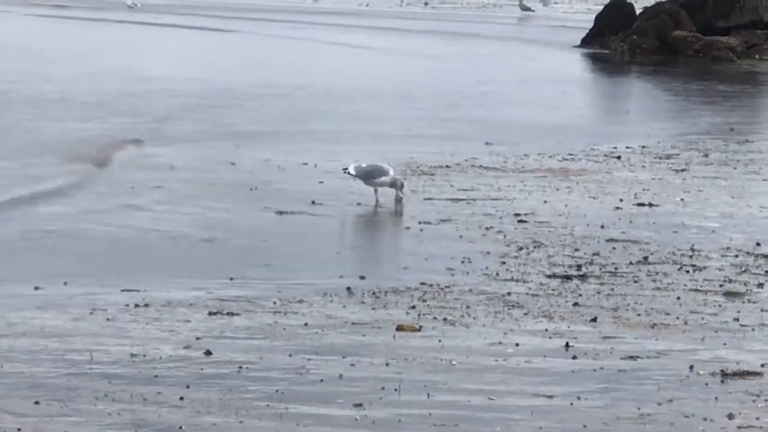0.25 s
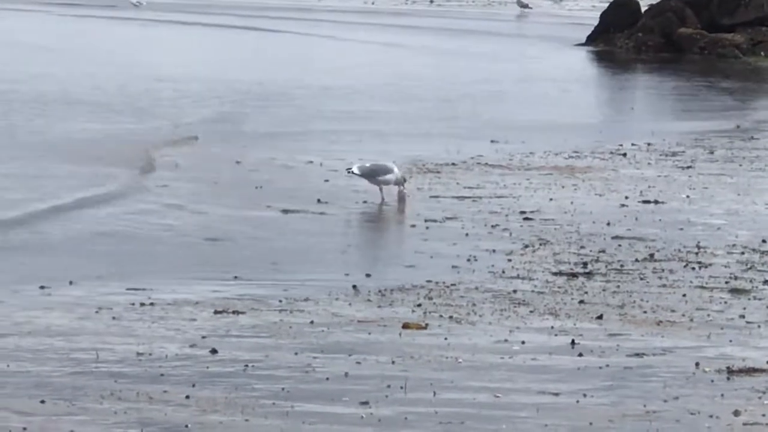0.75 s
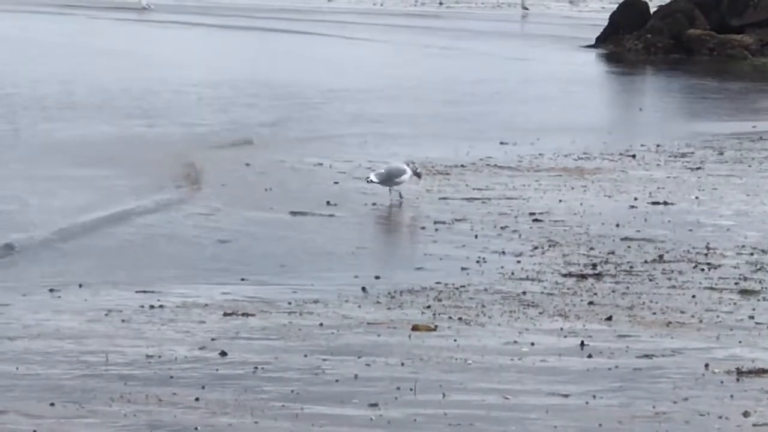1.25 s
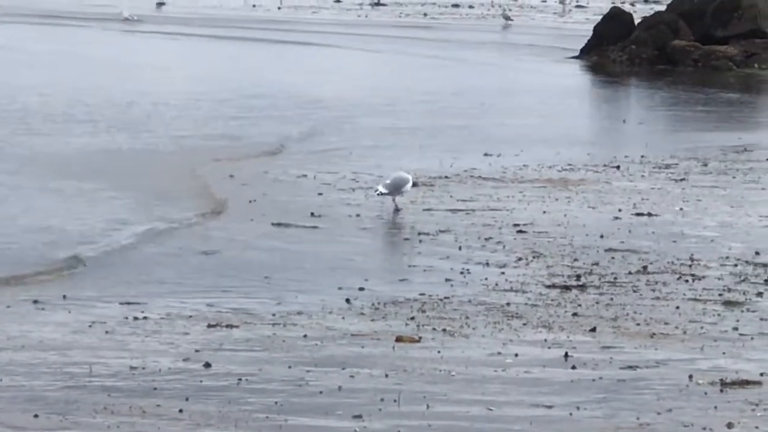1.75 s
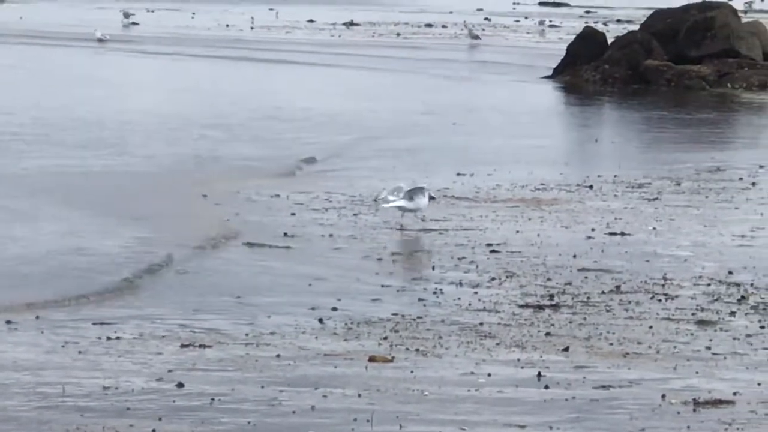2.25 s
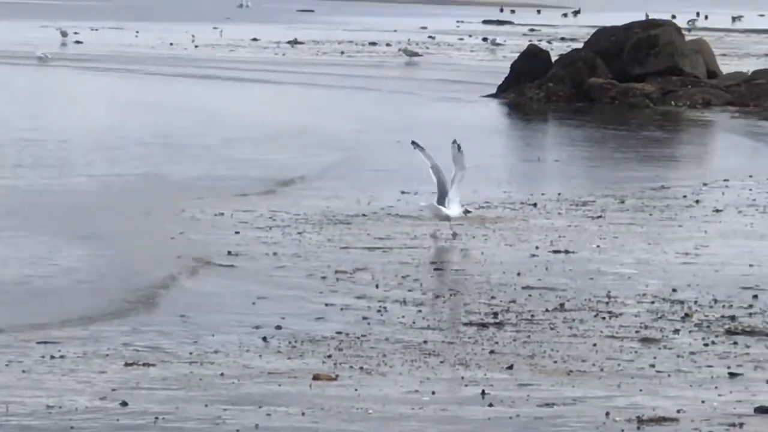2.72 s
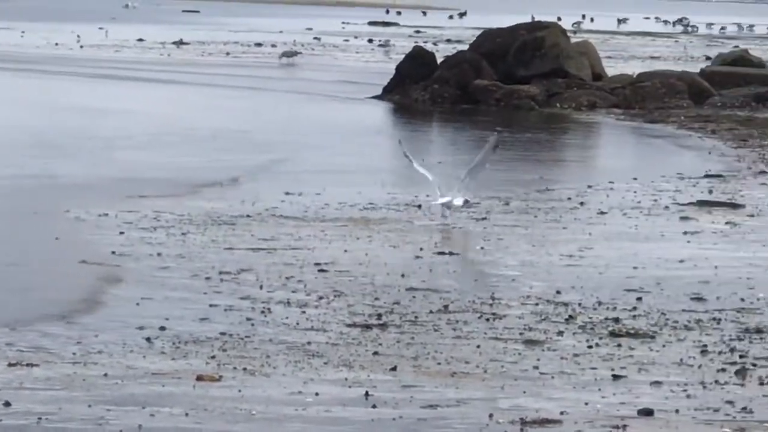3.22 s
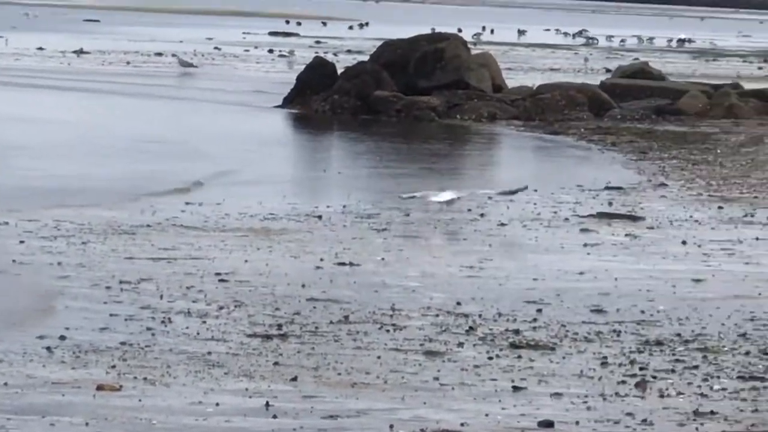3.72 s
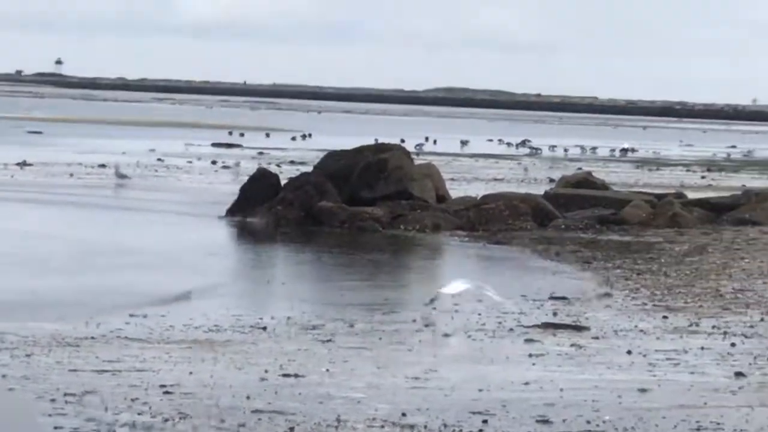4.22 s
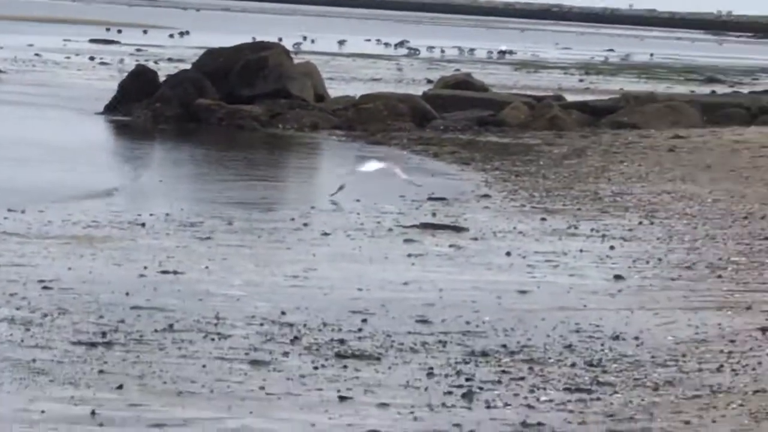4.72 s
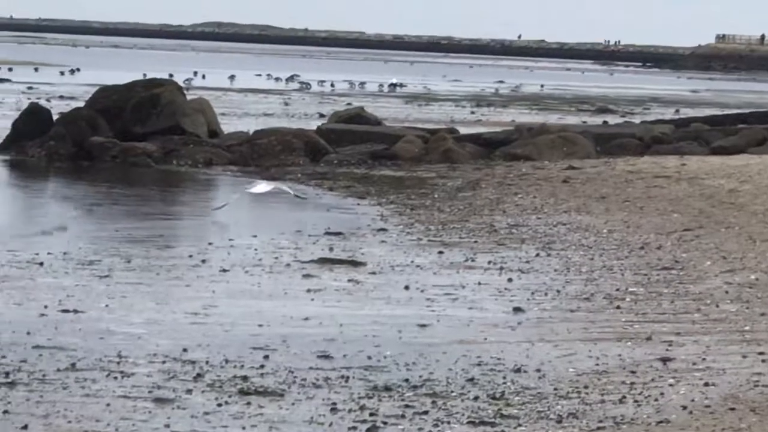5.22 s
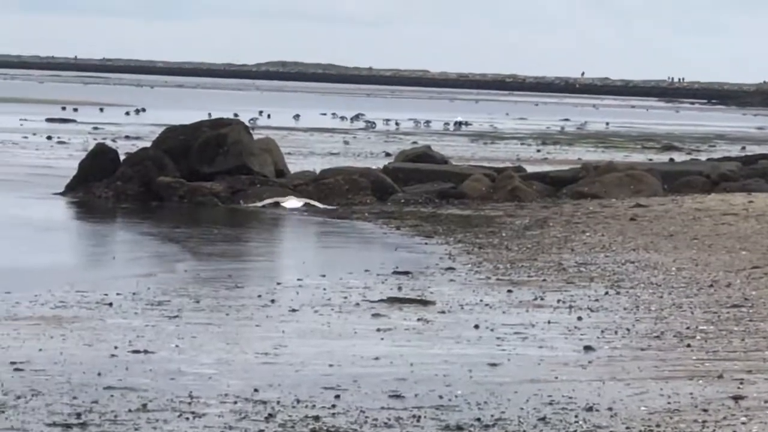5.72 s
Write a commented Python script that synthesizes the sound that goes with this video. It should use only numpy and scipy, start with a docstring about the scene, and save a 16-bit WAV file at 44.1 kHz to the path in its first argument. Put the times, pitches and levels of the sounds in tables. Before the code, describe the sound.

A gull gives two breaking squeals that end in squawks, then ten sharp yelps echoing off water and rocks, over a faint shore wash and low hum.

```python
"""A gull gives a long call on a tidal flat: two breaking squeals, each ending in a squawk, then ten yelps.
Most notes open with a slow pulsed creak; whistled tones with weak harmonics then crack between registers.
Delayed copies from water and rocks throw the call back. A far motor hums as a stack of sine orders,
a distant bird pipes gliding sines, and rustles and ticks of shaped noise stand over the noise wash of the shore."""
import sys
import numpy as np
from scipy import signal
from scipy.fft import rfft, irfft, next_fast_len
from scipy.io import wavfile
from scipy.ndimage import uniform_filter1d, map_coordinates

SR = 44100
rng = np.random.default_rng(int(sys.argv[2]) if len(sys.argv) > 2 else 0)


def file_out(sig):
    """Save sig as 16-bit WAV at sys.argv[1]."""
    # one column per channel
    cols = np.atleast_2d(sig).T
    # limit, then scale
    lim = np.clip(cols, -1, 1)
    pcm = np.round(lim * 32767).astype(np.int16)
    wavfile.write(sys.argv[1], SR, pcm)


N = 262836  # length in samples


def amp(db):
    """Decibels to gain."""
    return 10 ** (np.asarray(db) / 20)


def evened(x):
    """Scales to rms 1."""
    return x / np.sqrt(np.mean(x ** 2) + 1e-20)


def read(points, hz):
    """Reads a spectrum on a log-frequency axis."""
    f, value = np.transpose(points)
    return np.interp(np.log(hz + 1), np.log(f + 1), value)


def add(mix, s, sound):
    """Adds a sound at time s."""
    part = mix[max(round(s * SR), 0):][:len(sound)]
    part += sound[:len(part)]


def noise(colour):
    """Noise of rms 1 with the given spectrum."""
    spectrum = rfft(rng.standard_normal(N))
    return evened(irfft(spectrum * amp(read(colour, np.fft.rfftfreq(N, 1 / SR))), N))


def wander(size, hz):
    """Random drift, scaled to rms 1 over at least a second, that rolls off steeply above hz."""
    span = next_fast_len(max(size, SR))
    f = np.fft.rfftfreq(span, 1 / SR)
    return evened(irfft(rfft(rng.standard_normal(span)) / (1 + (f / hz) ** 4), span))[:size]


def resonate(x, hz, width):
    """A resonance of gain 1, fixed or moving: shifts hz down to zero, smooths, and shifts back."""
    turn = np.exp(2j * np.pi * np.cumsum(hz * np.ones(len(x))) / SR)
    r = np.exp(-np.pi * width / SR)
    return 2 * (turn * signal.lfilter([1 - r], [1, -r], x / turn)).real


def gull():
    """Squeals, yelps, creaks and squawks of one bird; every yelp ends by breaking into a lower register."""
    # Held notes of the squeals, one for each register. Each row: start in s, length in s, pitch in Hz,
    # sag at the end in Hz, level in dB, swell over the note in dB, second harmonic in dB re fundamental,
    # upper harmonics in dB before their roll-off, buzz in Hz, buzz depth 0-1.
    squeal_notes = [(.425, .048, 2075, 15, -29.5, 4, -12, -28, 330, .1),
                    (.485, .042, 2606, 16, -32, -1, -35, -43, 0, 0),
                    (.578, .103, 3303, 300, -33.5, 7, -48, -60, 0, 0),
                    (.683, .019, 2560, 110, -25, -3, -39, -51, 1280, .1),
                    (.703, .015, 1925, 132, -28.5, 0, -7.5, -31, 620, .5),
                    (.719, .003, 1564, 40, -36, 0, 0, -26, 400, .5),
                    (.735, .005, 1300, 60, -42, -3, -17, -34, 330, .5),
                    (.96, .047, 2025, 5, -30, -3, -20, -41, 330, .15),
                    (1.018, .053, 2605, 6, -27, -1, -33, -36, 0, 0),
                    (1.079, .082, 3300, 380, -42, -7, -30, -33, 0, 0),
                    (1.167, .022, 2350, 55, -40, -3, -10, -27, 580, .3),
                    (1.177, .056, 1802, 25, -26.5, 11, -11, -42, 500, .1),
                    (1.242, .018, 1745, 70, -32, -5, -13, -38, 350, .5)]
    # Shrill yelps. Each row: start in s, time to the crest in s, crest to break in s, crest pitch in Hz
    # before rounding, level in dB, pitch in Hz at the break before slip and fall, level after it in dB,
    # length after it in s, closing rattle in dB before its cut.
    shrill_yelps = [(1.37, 0.086, 0.052, 2414, -37.5, 1680, -27.5, .018, -39.5),
                    (1.665, 0.079, 0.051, 2452, -37, 1698, -29, 0.02, -39),
                    (1.976, .072, .05, 2457, -34.5, 1711, -26.5, .022, -40),
                    (2.292, .061, 0.041, 2495, -35, 1790, -28, 0.04, -43)]
    # Full yelps. Each row: start in s, time to the crest in s, crest to break in s, crest pitch in Hz
    # before rounding, level in dB, push on the way down in dB, climb in Hz per s, second harmonic on the
    # climb in dB re fundamental, pitch in Hz at the break before its sag, level after it in dB,
    # length after it in s, closing rattle in dB before its cut.
    full_yelps = [(2.606, 0.073, 0.075, 2008, -37.5, 8, 1860, -14.5, 1100, -47, 0.01, -42),
                  (2.945, .072, 0.07, 1993, -36, 6.5, 1635, -17.5, 1120, -46, 0.0096, -45),
                  (3.278, 0.073, 0.064, 1968, -35, 5.5, 1480, -17, 1060, -40.5, 0.014, -50),
                  (3.632, 0.069, 0.072, 1988, -35.5, 6.5, 1680, -15, 1113, -38, 0.012, -42.5),
                  (3.999, .072, .074, 1999, -35, 3.5, 995, -10.5, 1098, -38.5, 0.014, -43),
                  (4.399, .076, 0.065, 2027, -37.5, 2.5, 1200, -7, 1136, -31, 0.032, -49)]
    # The creaks that open notes. Each row: start in s, level in dB, length in s,
    # starting pulses per s, push as the bill opens in dB.
    creak_rows = [(0.391, -32, 0.042, 306, 0), (0.926, -31.5, 0.052, 292, -2), (1.626, -42.5, 0.11, 270, 5),
                  (1.929, -39.5, 0.086, 275, 1.5), (2.241, -44, 0.086, 270, 8),
                  (2.565, -41.5, 0.082, 282, 6.5), (2.895, -37.5, 0.079, 274, 3),
                  (3.232, -44.5, 0.105, 258, 9.5), (3.585, -39, 0.063, 270, 5.5),
                  (3.953, -37, 0.075, 262, 0.5), (4.35, -36.5, 0.076, 258, -0.5)]
    # Harsh squawks, one table each. Each row: time in s, level in dB, pulses per s,
    # bill opening 0-1, roughness (held to 0-1).
    squawk_tables = [
        [(.68, -68, 1380, 0, 0), (.688, -45, 1290, .2, .3), (.699, -34.5, 1370, .5, 0.1),
         (.705, -42, 630, 0.56, .6), (.722, -36.5, 514, 0.4, 1.1), (.728, -41, 376, 0.6, 0.7),
         (.736, -35, 300, 0.1, 0.5), (.745, -47, 230, .4, .6), (.757, -58, 240, 0.4, .8)],
        [(1.163, -48, 453, 0.7, 0.4), (1.175, -38, 500, 1, 0.42), (1.222, -43, 468, 0.9, 0.38),
         (1.236, -38, 354, 0.8, 0.3), (1.26, -36.5, 356, 0.9, 0.5), (1.285, -36.5, 297, 0.2, 0.7),
         (1.335, -44, 275, 0.1, 1), (1.39, -45, 300, 0.5, 0.8), (1.42, -54, 250, 0.56, 0.6)],
    ]
    early_s = 0.00044  # the upper note's held part ends this long before the break
    out = np.zeros(N)
    for row in squeal_notes:
        add(out, *squeal(*row))
    for yelps, note, broken in ((shrill_yelps, shrill_note, shrill_break), (full_yelps, full_note, full_break)):
        for s, rise, fall, *voice, low_hz, low_db, low_length, shut_db in yelps:
            break_at = s + rise + fall
            add(out, *note(s, rise, fall - early_s, *voice))
            add(out, *broken(break_at, low_length, low_hz, low_db))
            add(out, *shut(break_at + low_length, shut_db))
    for row in creak_rows:
        add(out, *creak(*row))
    for rows in squawk_tables:
        add(out, *squawk(rows))
    return out


def squeal(s, length, hz, sag_hz, db, swell_db, second_db, upper_db, buzz_hz, buzz,
           overshoot=0.014, settle_s=0.012, sag_s=0.0094, ends_db=-3, buzz_jitter=0.043):
    """A held note settles from slightly sharp and sags; the other side of the syrinx buzzes against it."""
    t = np.arange(int(length * SR)) / SR
    u = t / length
    pitch = hz * (1 + overshoot * np.exp(-t / settle_s)) - sag_hz * np.exp((t - length) / sag_s)
    effort_db = db + swell_db * (u - .5) + ends_db * (2 * u - 1) ** 2
    start, note = tone(s, pitch, effort_db, second_db, upper_db)
    turns = np.cumsum(buzz_hz * (1 + buzz_jitter * wander(len(note), 120))) / SR
    return start, note * (1 + buzz * np.cos(2 * np.pi * turns))  # the buzz splits the partials


def arch(rise, fall, crest_hz, climb_hz_per_s, sag, sag_s):
    """Time from a yelp's crest, and its pitch: a steady climb, a rounded crest, then a sag that eases off."""
    t = np.arange(-rise, fall, 1 / SR)
    climb = climb_hz_per_s * np.minimum(t, 0)
    drop = crest_hz * sag * (1 - np.exp(-np.maximum(t, 0) / sag_s))
    return t, uniform_filter1d(crest_hz + climb - drop, int(.016 * SR), mode="nearest")  # rounded over 16 ms


def shrill_note(s, rise, fall, crest_hz, db, start_db=-9, crest_db=-2, break_db=-3,
                second_start_db=-9, second_crest_db=-9, second_sag_db=-2, second_break_db=-6,
                upper_start_db=-40, upper_crest_db=-30, upper_break_db=-25, brighten_s=0.035):
    """A thin high arch; past the crest the second harmonic grows nearly as loud as the fundamental."""
    t, hz = arch(rise, fall, crest_hz, climb_hz_per_s=2600, sag=0.094, sag_s=0.0213)
    effort_db = db + np.interp(t, [-rise, 0, fall], [start_db, crest_db, break_db])
    second_db = np.interp(t, [-rise, 0, brighten_s, fall],
                          [second_start_db, second_crest_db, second_sag_db, second_break_db])
    upper_db = np.interp(t, [-rise, 0, fall], [upper_start_db, upper_crest_db, upper_break_db])
    return tone(s, hz, effort_db, second_db, upper_db, jitter=0.0023)


def shrill_break(s, length, hz, db, fall_hz_per_s=3300, slip=0.04, slip_s=0.0052, ends_db=-3,
                 second_db=-11, upper_db=-34):
    """The voice slips down into a short loud falling note."""
    t = np.arange(int(length * SR)) / SR
    pitch = hz * (1 + slip * np.exp(-t / slip_s)) - fall_hz_per_s * t
    effort_db = db + ends_db * (2 * t / length - 1) ** 2
    return tone(s, pitch, effort_db, second_db, upper_db, rise_cycles=3.92, fall_cycles=15, jitter=0.004)


def full_note(s, rise, fall, crest_hz, db, push_db, climb_hz_per_s, second_climb_db,
              push_s=0.017, ease_db=-3, ease_at=0.038, ease_s=0.025, choke_db=-6, choke_s=.006,
              second_start_db=-18, second_break_db=-6, upper_climb_db=-35, upper_break_db=-18):
    """A lower arch: it eases on the climb, is pushed and brightens from the crest, and chokes at the break."""
    t, hz = arch(rise, fall, crest_hz, climb_hz_per_s, sag=.225, sag_s=.056)
    ease = ease_db * np.exp(-((t + ease_at) / ease_s) ** 2)
    push = push_db * (1 - np.exp(-(np.maximum(t, 0) / push_s) ** 2))
    choke = choke_db * np.exp((t - fall) / choke_s)
    second_db = np.interp(t, [-rise, -ease_at, 0, fall],
                          [second_start_db, second_climb_db, second_climb_db, second_break_db])
    upper_db = np.interp(t, [-ease_at, fall], [upper_climb_db, upper_break_db])
    return tone(s, hz, db + ease + push + choke, second_db, upper_db)


def full_break(s, length, hz, db, sag=0.1423, sag_s=0.00634, fade_db=-2, second_db=-15,
               upper_db=-36, upper_start_db=-47, rattle_s=0.0116):
    """The voice drops to a low register and rattles out; the longer it holds, the cleaner it is."""
    t = np.arange(int(length * SR)) / SR
    rattle = rattle_s / length
    unsettled = np.exp(-t / sag_s)
    pitch = hz * (1 - sag * (1 - unsettled))
    upper = upper_db + (upper_start_db - upper_db) * unsettled
    return tone(s, pitch, db + fade_db * t / length, second_db, upper,
                rise_cycles=4, fall_cycles=15.6, jitter=.0035 * rattle, growl=.35 * rattle)


def tone(s, hz, db, second_db, upper_db, rise_cycles=11, fall_cycles=19, jitter=0.0027, slackness=2.42,
         shimmer_db=1.5, level_db=-1.0, thinning_db=10, half_db=-19, flutter=0.2, fray=0.27,
         growl=0.33, growl_db=-2):
    """A whistle with a second harmonic and weak upper ones; the slack low register is rougher."""
    # Fall of the upper harmonics. Each row: frequency in Hz, level in dB.
    overtones = [(3000, 33), (5200, -2), (7000, -10.5), (8800, -10), (9600, -11.5), (10400, -19),
                 (12000, -11.5), (15000, -34)]
    # the note fades in ahead of its start and fades out past its end
    rise, fall = int(rise_cycles * SR / hz[0]), int(fall_cycles * SR / hz[-1])
    gate = np.concatenate([np.linspace(0, 1, rise), np.ones(len(hz)), np.linspace(1, 0, fall)])
    columns = np.broadcast_arrays(hz, db, second_db, upper_db)
    hz, db, second_db, upper_db = (np.pad(c, (rise, fall), "edge") for c in columns)
    size = len(hz)
    unsteady = jitter * (2400 / hz) ** slackness
    phase = 2 * np.pi * np.cumsum(hz * (1 + unsteady * wander(size, 177))) / SR
    taut = np.clip((hz - 1950) / 350, 0, 1)  # the high register is steadier and has fewer harmonics
    slack = 1 - taut
    second = np.sin(2 * phase + fray * slack * wander(size, 260)) * (1 + flutter * slack * wander(size, 760))
    wave = np.sin(phase) + amp(second_db) * second
    for k in range(3, 9):
        harmonic_db = upper_db + read(overtones, k * hz) - thinning_db * taut * (k - 4.5)
        wave += amp(harmonic_db) * np.sin(k * phase) * (k * hz < SR / 2)
    # around 2300 Hz, between the registers, every other cycle differs: half lines
    between = np.exp(-((hz - 2300) / 70) ** 2)
    wave += between * amp(half_db + second_db) * sum(np.sin((k + .5) * phase) for k in range(3))
    if hz[0] < 1300:  # a note that starts this low rattles
        wave *= amp(growl_db) * (1 + growl * wander(size, 200))
    shimmer = shimmer_db * (2.0 - 0.96 * taut) * wander(size, 80)
    return s - rise / SR, gate * amp(level_db + db + shimmer) * wave


def creak(s, db, length, rate, push_db, speed_up=.14, fade_db=-8, attack=.013,
          opens_after=.016, opens_in=0.016, push_at=0.0078, push_width=0.02, lift_start=0.94, lift_end=1.064):
    """Slow pulses speed up, roughen and fade while the throat sweeps upward as the bill opens."""
    # Roughness 0-1 at the start and at the end.
    rough_ends = (.2, .7)
    t = np.arange(int(length * SR)) / SR
    u = t / length
    rough = np.interp(u, [0, 1], rough_ends)
    lift = np.interp(u, [0, 1], [lift_start, lift_end])
    pulses = rasp(rate * (1 + speed_up * u ** 2), (t - opens_after) / opens_in, rough, lift, jitter=.035)
    sweep_hz = np.interp((t / .031) ** 2, [0, 1], (1250, 2560))  # the main resonance climbs for 31 ms
    pulses = evened(pulses + amp(3) * resonate(pulses, sweep_hz, 230))
    effort_db = db + fade_db * u + push_db * np.exp(-((t - push_at) / push_width) ** 2)
    gate = np.minimum(1, t / attack) * np.minimum(1, 6 * (1 - u))
    return s - attack / 4, amp(effort_db) * gate * pulses


def squawk(rows, hiss_db=-23, bend=0.047, bend_hz=25):
    """Pulses change rate and roughness; the strained throat rings and bends, and air hisses through the bill."""
    # Air through the open bill. Each row: frequency in Hz, relative density in dB per Hz.
    bill_hiss = [(2000, -18), (4500, -15), (6500, 19), (7500, -13), (9000, -25), (16000, -30)]
    # Narrow resonances of the strained throat. Each row: frequency in Hz before bending, width in Hz, level in dB.
    throat_ring = [(1480, 110, -8), (2840, 160, 2)]
    s, *columns = np.transpose(rows)
    t = np.arange(s[0], s[-1], 1 / SR)
    db, rate, opening, rough = (np.interp(t, s, c) for c in columns)
    rough = np.clip(rough, 0, 1)
    lift = 1 + bend * rough * wander(len(t), bend_hz)
    voiced = rasp(rate, opening, rough, lift, jitter=0.028, breath=.55)
    ring = sum(amp(ring_db) * resonate(voiced, hz * lift, width) for hz, width, ring_db in throat_ring)
    hiss = amp(hiss_db) * opening ** 2 * noise(bill_hiss)[:len(t)]
    return s[0], amp(db) * (evened(voiced + ring) + hiss) * signal.windows.tukey(len(t), .04)


def shut(s, db, length=.022, rate=270, slow_down=0.314, lift_start=0.93, lift_end=0.86, cut_db=-3):
    """Every yelp shuts with a soft, dull rattle that slows and sinks."""
    u = np.linspace(0, 1, int(length * SR))
    lift = np.interp(u, [0, 1], [lift_start, lift_end])
    rattle = rasp(rate * (1 - slow_down * u), 0 * u, .5, lift, top_hz=1700)
    return s - length / 4, amp(db + cut_db) * np.sin(np.pi * u) * rattle


def rasp(rate, opening, rough, lift, jitter=.018, uneven_db=3.0, breath=1.0, top_hz=7800):
    """Uneven slaps of the syrinx, each with a puff of air, ring a throat that changes as the bill opens."""
    # Throat with the bill nearly shut, then open. Each row: frequency in Hz before the lift,
    # width in Hz of each of two passes, level in dB.
    throat_shut = [(280, 74, -12.5), (1335, 180, -1), (1520, 730, 1), (2680, 170, 1.5), (6020, 620, -16)]
    throat_open = [(263, 420, -8.5), (1345, 426, 7.5), (2386, 280, 8.5), (2730, 900, 6), (4410, 144, -1),
                   (6300, 310, -12)]
    size = len(rate)
    turns = np.cumsum(rate * (1 + rough * jitter * wander(size, 150))) / SR
    slaps = evened(np.diff(np.floor(turns), prepend=-1) / np.sqrt(rate))
    puffs = evened(np.exp(-(turns % 1) / 0.84) * rng.standard_normal(size))
    drive = (slaps + rough * breath * puffs) * amp(rough * uneven_db * wander(size, 160))

    def ring(throat):
        """Sums the resonances, each passed twice."""
        return evened(sum(amp(db) * resonate(resonate(drive, hz * lift, width), hz * lift, width)
                          for hz, width, db in throat))

    opening = np.clip(opening, 0, 1)
    voiced = np.sqrt(1 - opening) * ring(throat_shut) + np.sqrt(opening) * ring(throat_open)
    return signal.sosfilt(signal.butter(4, top_hz, fs=SR, output="sos"), voiced)


def water_echo(x):
    """The reflection off the water, lagging more as the bird flies; while the lag grows it is slightly flat."""
    # Each row: time in s, delay in s, level in dB.
    lag_rows = [(0, .011, -28), (1.2, 0.014, -14.5), (1.8, 0.033, -11.5), (3.001, 0.042, -13.5),
                (4, 0.042, -14), (4.55, 0.047, -7)]
    t = np.arange(N) / SR
    s, *columns = np.transpose(lag_rows)
    delay, db = (np.interp(t, s, c) for c in columns)
    return amp(db) * map_coordinates(x, [(t - delay) * SR], order=3)


def shore_echo(x, tail_db=-12, scatter_s=0.0014):
    """A few slightly smeared reflections over a tail that starts early and dies sooner in the treble."""
    # Reflections off rocks and sand. Each row: delay in s, level in dB.
    reflections = [(.0072, -28.5), (.027, -21.5), (.031, -12.5), (.041, -16), (.055, -20.5)]
    # Decay of the tail. Each row: frequency in Hz, time to fall 60 dB in s.
    tail_decay = [(300, 0.68), (1500, 0.53), (3000, 0.48), (6000, 0.28), (12000, 0.1)]
    # Where the echoes ring brightest. Each row: frequency in Hz, width in Hz, added level in dB.
    bright_bands = [(2336, 107, 2.5), (3840, 870, -1)]
    sparse = rng.standard_normal(SR) * (rng.random(SR) < 2000 / SR)
    hz, t, z = signal.stft(sparse, SR, nperseg=256)
    tail = signal.istft(z * amp(-60 * t / read(tail_decay, hz)[:, None]), SR, nperseg=256)[1]
    response = np.zeros(SR)
    add(response, .012, amp(tail_db) * tail / np.linalg.norm(tail))
    t = np.arange(500) / SR
    for delay, db in reflections:
        face = (t == 0) + 0.054 * rng.standard_normal(len(t)) * np.exp(-t / scatter_s)
        add(response, delay, amp(db) * face / np.linalg.norm(face))
    thrown = x + sum(amp(db) * resonate(x, hz, width) for hz, width, db in bright_bands)
    return signal.fftconvolve(thrown, response)[:N]


def far_bird():
    """Thin sine notes that glide and level off."""
    # Each row: start in s, length in s, start pitch in Hz, end pitch in Hz, level in dB.
    pipe_notes = [(4.712, .028, 4380, 4560, -60), (4.974, .052, 3980, 3490, -58),
                  (5.268, .021, 3770, 3580, -60), (5.366, .043, 3280, 3770, -57),
                  (5.463, .023, 3780, 3340, -59), (5.58, .03, 3650, 4020, -60.5),
                  (5.659, .02, 3060, 2460, -54.5), (5.802, .034, 3500, 3860, -56),
                  (5.88, .025, 3400, 2440, -55)]
    out = np.zeros(N)
    for s, length, start_hz, end_hz, db in pipe_notes:
        u = np.linspace(0, 1, int(length * SR))
        hz = end_hz + (start_hz - end_hz) * (1 - u) ** 1.63
        pipe = np.sin(2 * np.pi * np.cumsum(hz) / SR)
        add(out, s, amp(db) * signal.windows.tukey(len(u), .6) * pipe)
    return out


def rustles(grain_db=3):
    """Brief grainy swells of hiss near the microphone."""
    # Each row: start in s, level in dB, length in s.
    swells = [(2.91, -54, .05), (3.348, -52, .012), (3.37, -56, .08), (3.498, -55, .008), (3.80, -57, .03),
              (4.0, -53, .22), (4.648, -49.5, .055)]
    # Each row: frequency in Hz, relative density in dB per Hz.
    rustle_colour = [(500, 10.5), (1500, 16), (4000, 3.5), (8000, 5.5), (10300, 0.5), (12500, 0),
                     (16000, -14)]
    level = np.zeros(N)
    for s, db, length in swells:
        add(level, s, amp(db) * signal.windows.tukey(int(length * SR), .8))
    return level * evened(noise(rustle_colour) * amp(grain_db * wander(N, 390)))


def ticks(per_s=7, db=-60, spread_db=3, ring_s=0.0012):
    """Tiny sparse ticks from the wet sand: decaying bursts of bright noise."""
    strength = amp(db + spread_db * np.clip(rng.standard_normal(N), -2, 2))
    clicks = (rng.random(N) < per_s / SR) * strength
    level = signal.lfilter([1], [1, -np.exp(-1 / (ring_s * SR))], clicks)
    return level * evened(np.diff(rng.standard_normal(N + 1)))


def motor(shaft_hz=12.55, drift=0.0052, waver_db=2):
    """Low orders of a far engine's shaft, each wavering in level, throb against each other."""
    # Each row: multiple of the shaft rate, rms level in dB before wavering.
    orders = [(4, -66), (5, -69), (6, -63.5), (7, -82), (8, -88), (9, -60), (10, -67), (11, -71.5)]
    turns = np.cumsum(shaft_hz * (1 + drift * wander(N, 2.3))) / SR
    out = np.zeros(N)
    for k, db in orders:
        level = amp(db + waver_db * wander(N, 13.0)) * np.sqrt(2)
        out += level * np.sin(2 * np.pi * (k * turns + rng.random()))
    return out


def wash(level_db=-58, flutter_db=.8, rumble_edge_hz=90):
    """Deep rumble of the air under a slowly swelling hiss of shallow water."""
    # Each row: frequency in Hz, relative density in dB per Hz.
    shore_colour = [(15, -50), (25, -13), (59, 1), (116, -4), (209, -10.5), (233, -13), (495, -15.5),
                    (722, -11), (1240, -9.5), (1710, -12), (3340, -16), (3720, -20), (4750, -22),
                    (8580, -28), (15500, -38)]
    # Each row: time in s, gain of the wash in dB, gain of the rumble in dB.
    swell = [(0, 2, 7), (1.3, 1, -4.5), (2.2, 4.5, 6.5), (3, 4, 4), (3.999, 6.5, -18), (4.7, 5.5, -8),
             (5.96, 2, 3)]
    air = amp(level_db) * noise(shore_colour)
    rumble = signal.sosfiltfilt(signal.butter(2, rumble_edge_hz, fs=SR, output="sos"), air)
    s, *columns = np.transpose(swell)
    wash_db, rumble_db = (np.interp(np.arange(N) / SR, s, c) for c in columns)
    return amp(rumble_db) * rumble + (air - rumble) * amp(wash_db + flutter_db * wander(N, 39))


def scene():
    """Birds and their echoes over the shore."""
    near = gull()
    birds = near + far_bird()
    echoes = water_echo(near) + shore_echo(birds)
    return (birds + echoes + rustles() + ticks() + motor() + wash())[None]


def record(dry):
    """The recorder's band limit: a steep low-pass at 15720 Hz."""
    band = signal.firwin(511, 15720, window=("kaiser", 9), fs=SR)
    return signal.oaconvolve(dry, band[None], "same")


dry = scene()
out = record(dry)
file_out(out)
```